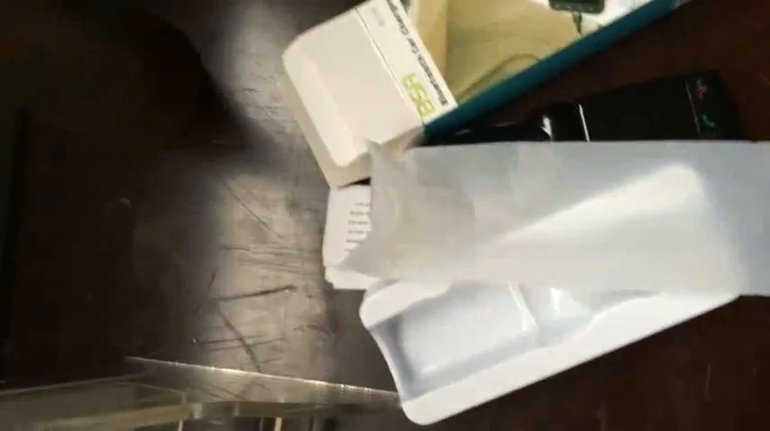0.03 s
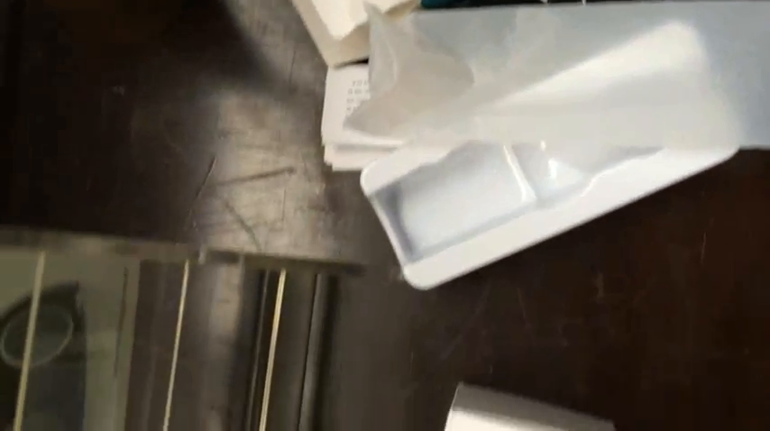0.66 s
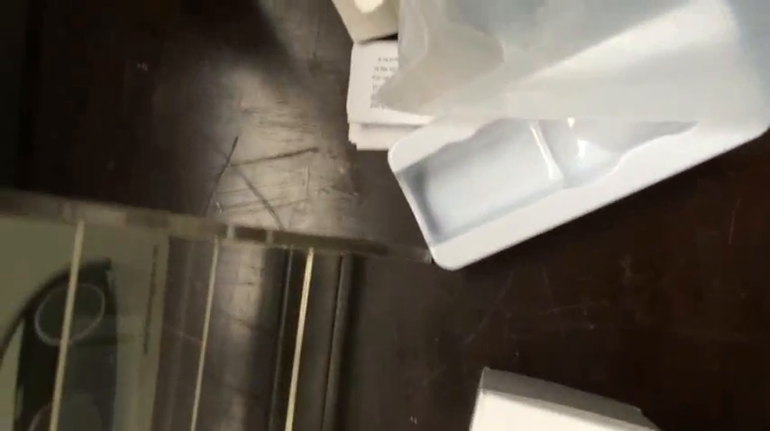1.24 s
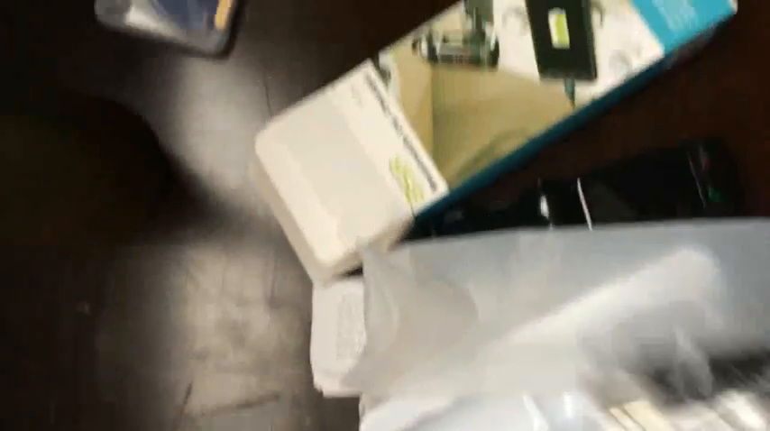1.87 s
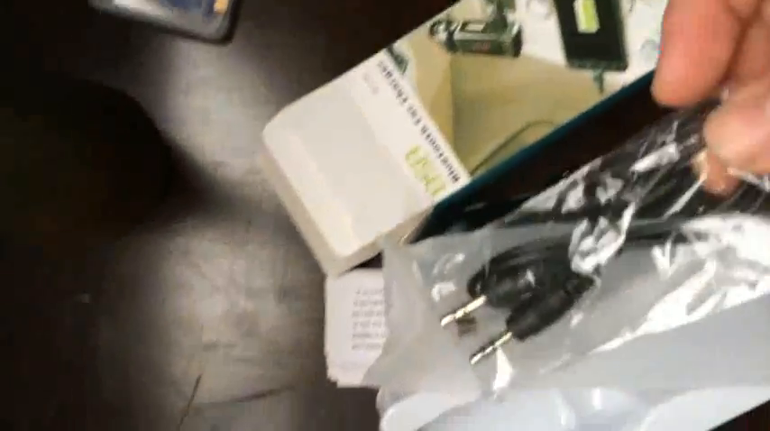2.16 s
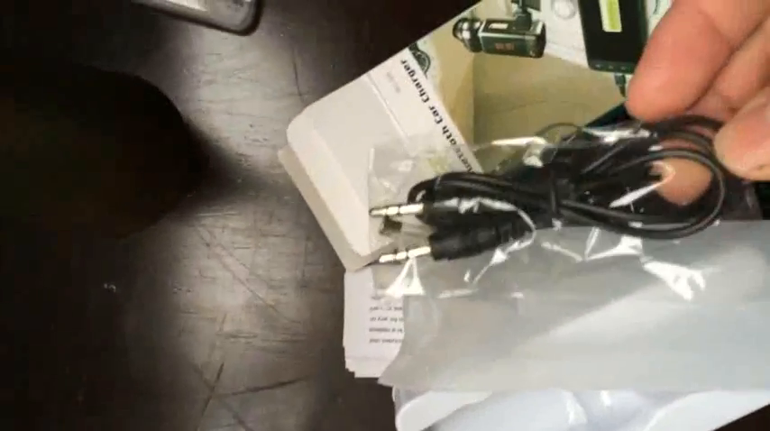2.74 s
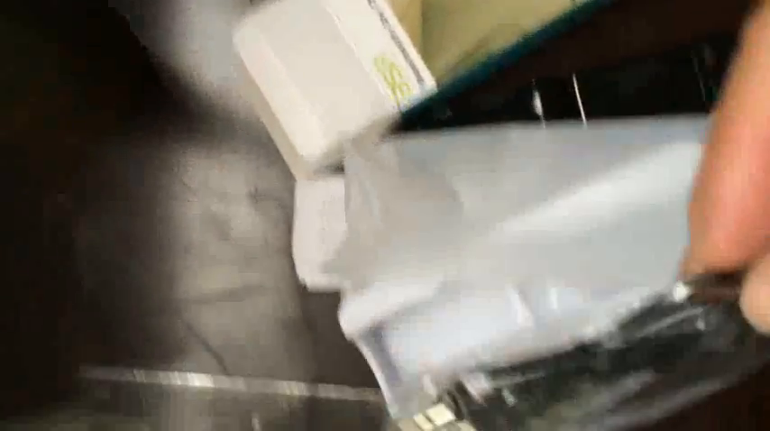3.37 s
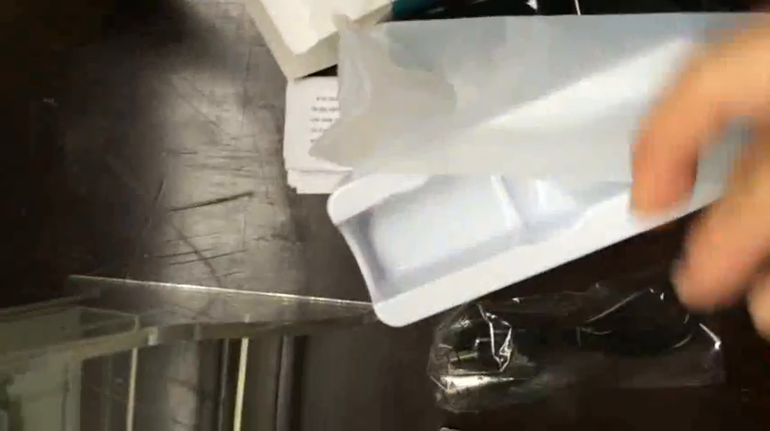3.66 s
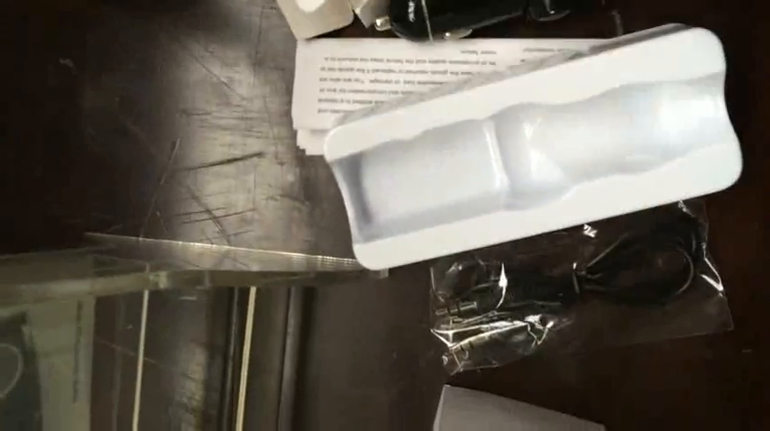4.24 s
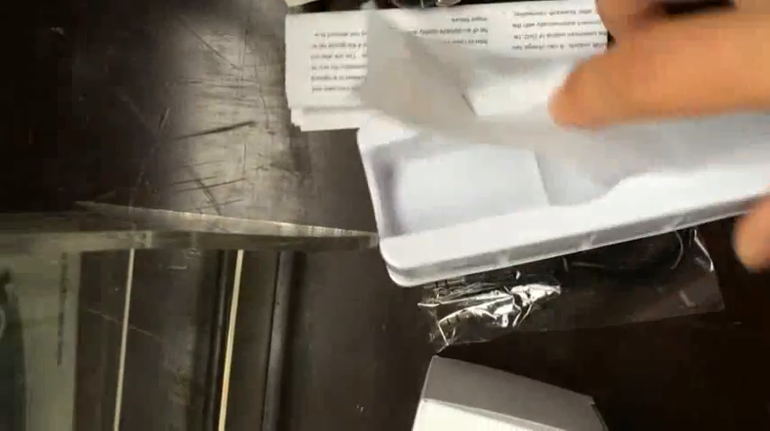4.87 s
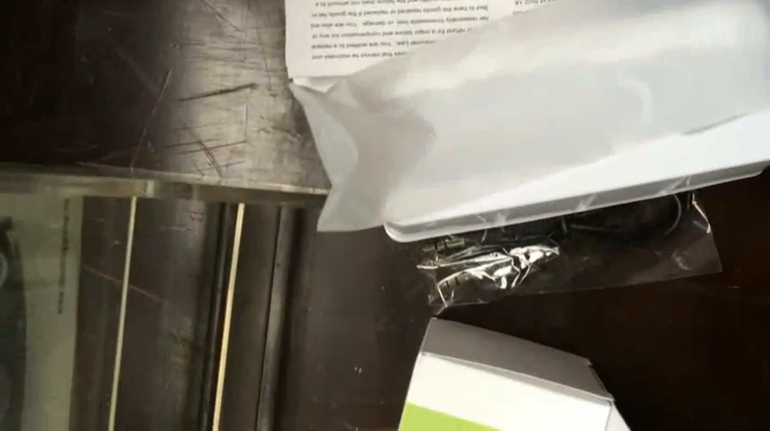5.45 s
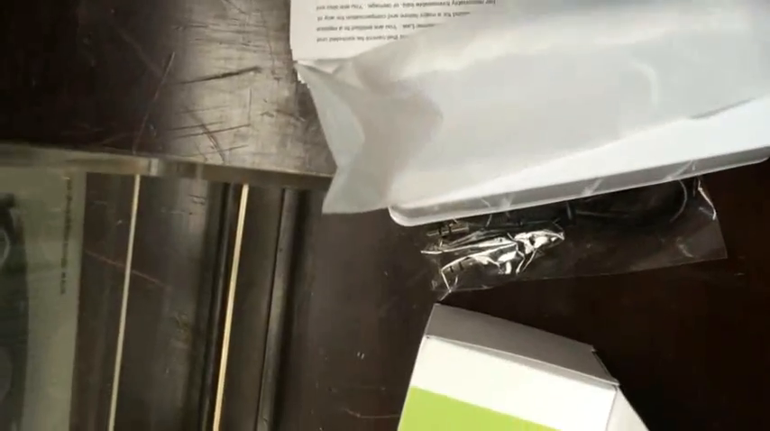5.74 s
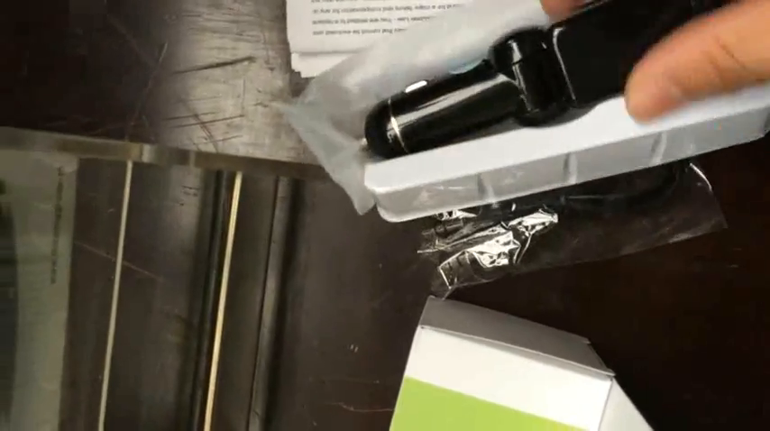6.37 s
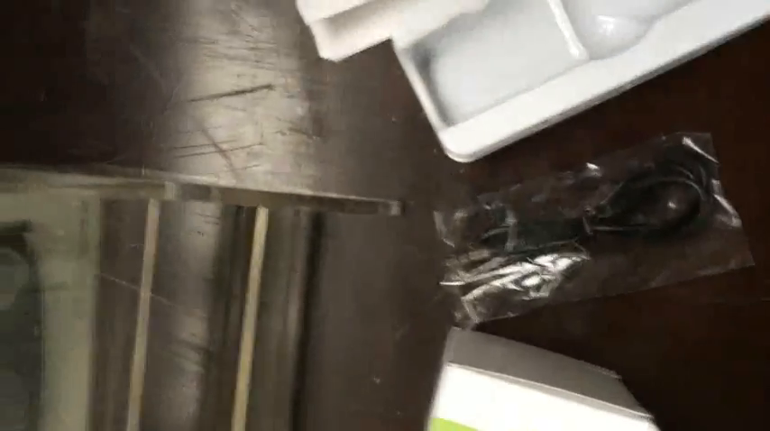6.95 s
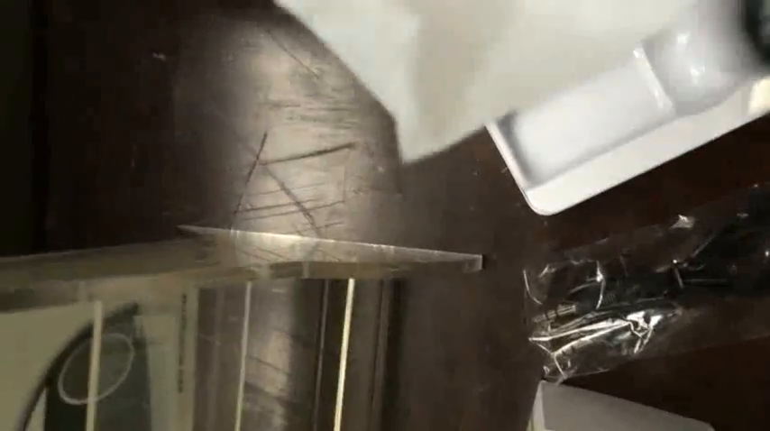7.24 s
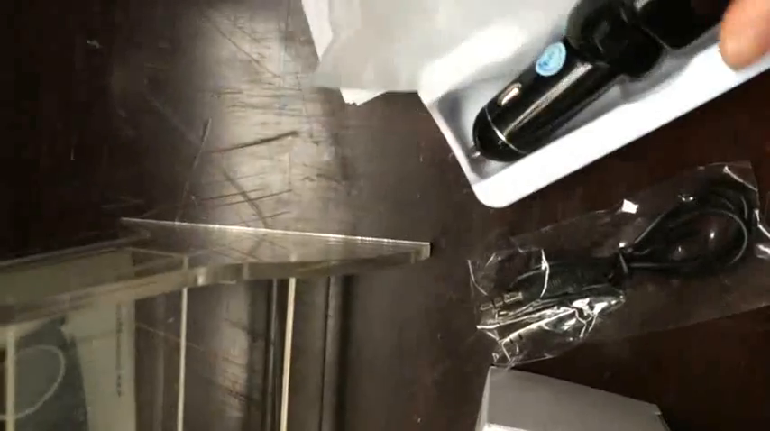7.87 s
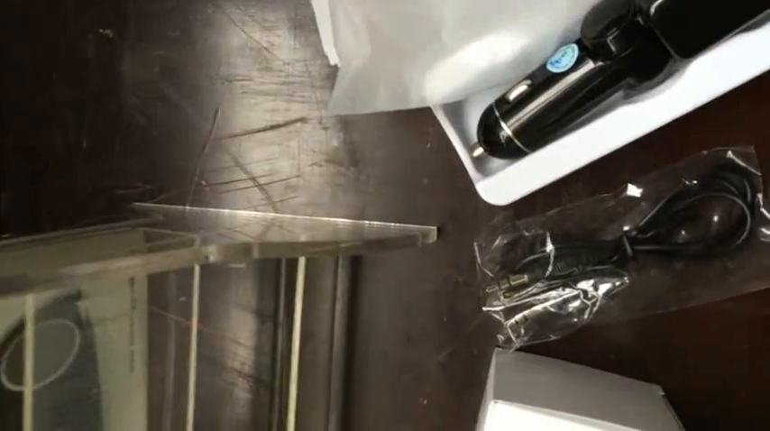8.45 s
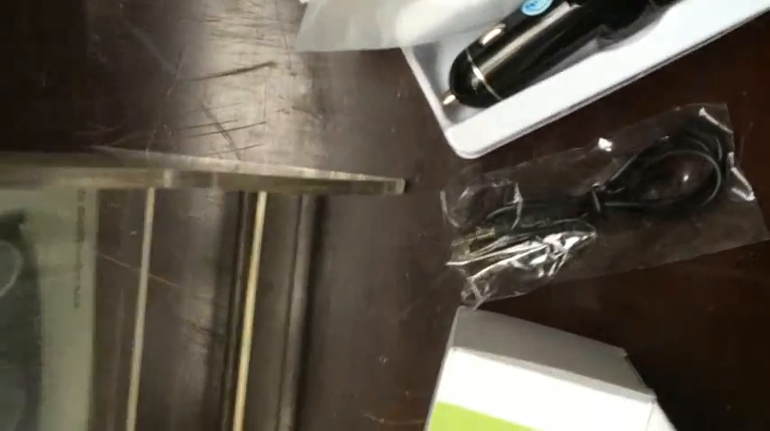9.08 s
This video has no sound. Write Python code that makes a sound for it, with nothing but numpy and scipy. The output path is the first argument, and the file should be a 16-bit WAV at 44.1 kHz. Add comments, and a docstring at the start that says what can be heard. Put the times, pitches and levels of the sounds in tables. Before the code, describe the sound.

A cardboard box scrapes, a plastic bag crinkles, then a thud on wood and a gadget knocking in its plastic tray in a quiet room.

```python
"""A quiet room with a low hum: hands unpack a small gadget on a wooden table, close by.
A cardboard box scrapes and bumps, a thin plastic bag crinkles and is put down, something thuds on the
table, and the hard gadget rubs and clatters in its moulded plastic tray. Blows ring the modes of box,
table and tray; stick-slip friction makes the rubs and squeaks; creases snapping over make the crinkle."""
import sys
import numpy as np
from scipy import signal
from scipy.fft import rfft, irfft
from scipy.io import wavfile
from scipy.ndimage import uniform_filter1d

SR = 44100
rng = np.random.default_rng(int(sys.argv[2]) if len(sys.argv) > 2 else 0)


def generate_wav(sig):
    """Save sig (samples, or channels by samples) to the path in sys.argv[1] as 16-bit PCM at SR."""
    pcm = np.round(np.clip(np.atleast_2d(sig).T, -1, 1) * 32767).astype(np.int16)
    wavfile.write(sys.argv[1], SR, pcm)


N = 406152


def undb(db):
    """Decibels to gain."""
    return 10 ** (np.asarray(db) / 20)


def unit(x):
    """Scale to rms 1."""
    return x / np.sqrt(np.mean(x ** 2) + 1e-20)


def seconds(length_s):
    """Time axis."""
    return np.arange(int(length_s * SR)) / SR


def fade(t, t60_s):
    """Exponential decay, 60 dB in t60_s."""
    return np.exp(-np.log(1000) * t / max(t60_s, 1e-4))


def add(track, start_s, sound):
    """Mix a sound in at start_s."""
    i = max(int(start_s * SR), 0)
    track[i:i + len(sound)] += sound[:max(N - i, 0)]


def through(x, response):
    """Convolve, keeping the input length."""
    return signal.fftconvolve(x, response)[:len(x)]


def spectrum_db(points, size=1024):
    """Interpolate (Hz, dB) points onto FFT bins."""
    hz, db = np.transpose(points)
    return np.interp(np.log(np.fft.rfftfreq(size, 1 / SR) + 1), np.log(hz), db)


def minimum_phase(db):
    """Most compact impulse response with this spectrum."""
    cepstrum = irfft(np.log(undb(db)))
    cepstrum[1:] *= 2
    cepstrum[len(cepstrum) // 2:] = 0
    return irfft(np.exp(rfft(cepstrum)))


def bell(hz, centre_hz, reach_oct):
    """Gain of 1 at the centre, half at reach_oct either side."""
    return 1 / (1 + (np.log2(hz / centre_hz) / reach_oct) ** 2)


def wander(rate_hz):
    """Smooth random drift, rms 1."""
    hold = int(SR / rate_hz)
    steps = np.repeat(rng.standard_normal(N // hold + 1), hold)
    return unit(uniform_filter1d(uniform_filter1d(steps, hold), hold)[:N])


def gesture(strokes, release_t60_s=0.13):
    """Envelope of hand strokes: each speeds up, holds and dies away."""
    out = np.zeros(N)
    for start_s, length_s, attack_s, db in strokes:
        t = seconds(length_s + release_t60_s)
        attack = np.minimum(t / attack_s, 1)
        release = fade(np.maximum(t - length_s, 0), release_t60_s)
        add(out, start_s, undb(db) * attack * release)
    return out


def slips(per_s, jerk_hz, spread_db=3):
    """Stick-slip impulses, mostly weak, coming in uneven jerks."""
    strength = undb(spread_db * np.minimum(rng.exponential(size=N), 5))
    impulses = (rng.random(N) < per_s / SR) * strength * rng.choice([-1, 1], N)
    return impulses * undb(spread_db * wander(jerk_hz))


def ring(modes, centre_hz, reach_oct=0.9):
    """A body's clear modes: contact favours those near centre_hz, each grip shifts them a little."""
    t = seconds(0.3)
    out = np.zeros(len(t))
    for hz, db, t60_s in modes:
        db += 2 * rng.standard_normal()
        hz *= 1 + 0.03 * min(hz / 1500, 1) * rng.standard_normal()
        out += undb(db) * bell(hz, centre_hz, reach_oct) * fade(t, t60_s) * np.sin(2 * np.pi * hz * t)
    return unit(out)


def clack(modes, centre_hz, reach_oct=1.07):
    """Heavily damped modes merge into one broad, dry response."""
    hz = np.fft.rfftfreq(1024, 1 / SR) + 1
    outline = [(SR / 1024, modes[0][1] - 20)] + [row[:2] for row in modes] + [(SR / 2, -32)]
    contact_db = 20 * np.log10(bell(hz, centre_hz, reach_oct))
    return unit(minimum_phase(spectrum_db(sorted(outline)) + contact_db))


def rub(strokes, modes, centre_hz, ringing):
    """Stick-slip drives a body's damped and clear modes."""
    drive = slips(per_s=2000, jerk_hz=55)
    damped = unit(through(drive, clack(modes, centre_hz, reach_oct=2.8)))
    clear = unit(through(drive, ring(modes, centre_hz)))
    return unit(damped + ringing * clear) * gesture(strokes)


# Wooden table top. Each row: mode in Hz, relative level in dB, t60 in seconds.
TABLE_MODES = [(197, -10.5, 0.099), (272.8, -16, 0.63), (324.4, -12, 0.1105), (410, -8, 0.07),
               (550, -12, .06), (646, -0.5, 0.022), (765, -7.5, 0.04), (960, -6.5, 0.025),
               (1120, -10.5, 0.048), (1520, -9, 0.054), (1870, -4.5, 0.0186), (2800, -20, 0.013)]
def blows(events, modes, give_s, rattle, rattle_t60_s, tick_t60_s=0.026, knock_gain=1.0):
    """A blow rings a body and chatters; hard edges tick, weight thumps the table below."""
    out, t = np.zeros(N), seconds(0.3)
    onset = 1 - np.exp(-(t / give_s) ** 2)  # builds while the surface gives
    for start_s, db, centre_hz, tick_db, thump_db in events:
        damped = clack(modes, centre_hz)
        clear = ring(modes, centre_hz) * onset
        chatter = through(rng.standard_normal(len(t)) * fade(t, rattle_t60_s), damped)
        knock = damped * onset[:len(damped)]
        body = clear / np.linalg.norm(clear) + rattle * chatter / np.linalg.norm(chatter)
        add(body, 0, knock_gain * knock / np.linalg.norm(knock))
        body /= np.abs(body).max()
        tick = 0.5 * rng.standard_normal(len(t)) * fade(t, tick_t60_s)
        thump = ring(TABLE_MODES, centre_hz=290, reach_oct=0.29) * fade(t, 0.27) * (1 - fade(t, 0.0346))
        thump *= 0.65 / np.abs(thump).max()
        add(out, start_s, undb(db) * (body + undb(tick_db) * tick + undb(thump_db) * thump))
    return out


# Room noise. Each row: frequency in Hz, relative density in dB.
AIR_SPECTRUM = [(12, -58), (20, -32.5), (42, -7.5), (64, -9), (153, -11.5), (225, -18.5), (298, -24.5),
                (324, -26.5), (393, -25), (788, -34), (1130, -33), (1340, -37), (1670, -38.5), (2400, -42),
                (15500, -60)]
# Hum. Each row: mean frequency in Hz, nominal rms in dB.
HUM_TONES = [(50, -55.5), (66.3, -48.5), (113, -57.5)]
def room_tone(air_db=-42.5, waver_db=3.5, waver_hz=1.2):
    """Soft rumble and hiss under a low, wavering hum."""
    white = rfft(rng.standard_normal(N))
    out = undb(air_db) * unit(irfft(white * undb(spectrum_db(AIR_SPECTRUM, N)), N))
    for hz, db in HUM_TONES:
        amplitude = np.sqrt(2) * undb(db + waver_db * wander(8.3))
        phase = 2 * np.pi * np.cumsum(hz + waver_hz * wander(5.1)) / SR
        out += amplitude * np.sin(phase)
    return out


# Cardboard box. Each row: mode in Hz, relative level in dB, t60 in seconds.
BOX_MODES = [(195, -0.5, 0.042), (290, -13.5, 0.019), (417, -10, 0.007), (776, -4, 0.034), (842, -4, 0.012),
             (856, -10, 0.0062), (1304, -8.5, 0.012), (1526, -7, 0.035), (1828, -12.5, 0.056),
             (2510, -13, 0.045)]
# Pushes. Each row: start, length and attack in seconds, level in dB.
BOX_STROKES = [(0, .3, 0.016, -40), (.3, 0.13, 0.0073, -35.5), (.83, 0.61, 0.047, -45),
               (1.38, 0.29, 0.018, -37)]
def box_slide():
    """Cardboard sticks and slips as the box is pushed along."""
    return rub(BOX_STROKES, BOX_MODES, centre_hz=1320, ringing=0.76)


# Sliding film. Each row: frequency in Hz, relative density in dB.
RUSTLE_SPECTRUM = [(880, -47), (1500, 0.5), (2670, 1.5), (3480, -0.5), (8540, 1.5), (11400, 0),
                   (14600, -1.5), (15500, -9.5)]
# Hands on the film. Each row: start, length and attack in seconds, rustle and crinkle gains in dB.
FILM_HANDLING = [(0, 0.22, 0.0047, -59, -42), (0.186, 0.246, 0.11, -39, -39), (0.823, 0.61, 0.27, -32, -30),
                 (1.454, .44, 0.022, -52, -38.5), (1.953, 0.45, 0.061, -51, -36.5),
                 (2.487, 0.29, 0.014, -71, -43.5), (3.115, 0.059, 0.012, -67, -31),
                 (3.3, 0.0896, .015, -69.5, -44.5), (3.51, 0.09, 0.0092, -59, -32),
                 (3.62, 0.17, 0.063, -35.5, -27.5), (4.009, 0.18, 0.02, -53, -46.5),
                 (4.541, 0.33, 0.023, -56.5, -50), (4.92, 0.15, .04, -47, -34.5),
                 (5.31, 0.034, 0.011, -56.5, -49), (5.516, 0.083, 0.018, -44.5, -51),
                 (6.051, 0.18, 0.027, -55, -37), (6.4, .39, 0.37, -44, -34), (7.839, 0.24, 0.045, -55, -47),
                 (8.423, 0.052, 0.023, -47, -43)]
def film_rustle():
    """Countless small creases creep while the plastic film slides."""
    grains = slips(per_s=4000, jerk_hz=110, spread_db=3.5)
    rustle = unit(through(grains, minimum_phase(spectrum_db(RUSTLE_SPECTRUM))))
    return rustle * gesture([row[:4] for row in FILM_HANDLING])


def film_crinkle(per_s=48, centre_hz=6400, spread_oct=0.58, spread_db=3):
    """Lesser creases snap at random while a hand works the film."""
    lateness, strength, brightness = rng.standard_normal((int(per_s * N / SR), 3)).T
    starts_s = np.abs(np.arange(len(lateness)) + 0.5 * lateness) / per_s
    creases = zip(starts_s, spread_db * strength, centre_hz * 2 ** (spread_oct * brightness))
    return film_snaps(creases) * gesture([(*timing, db) for *timing, _, db in FILM_HANDLING])


# Bumps. Each row: start in seconds, level in dB, ring centre in Hz, relative tick and thump in dB.
BOX_HITS = [(0.0368, -22, 804, -26, -17), (0.1072, -10.5, 780, -8, -37), (1.0966, -24, 814, 9, -25),
            (1.2342, -30, 820, 0, -22), (1.3904, -23, 1470, 9.5, -12), (1.4133, -21.5, 334, 9.5, -28),
            (1.4654, -19.5, 776, 4.5, -7), (1.4852, -4.5, 850, -17, -27.5)]
def box_bumps():
    """Soft cardboard gives slowly, then rings and rattles."""
    return undb(3) * blows(BOX_HITS, BOX_MODES, give_s=0.0038, rattle=0.72, rattle_t60_s=0.044)


# Scrapes. Each row: midpoint in seconds, rms at the crest in dB, centre in Hz, length in seconds.
EDGE_SCRAPES = [(.092, -26.5, 1580, 0.02), (0.257, -33, 1710, 0.031), (1.396, -27.5, 1960, 0.023),
                (1.422, -35, 875, 0.073), (1.481, -26.5, 1030, 0.025), (4.054, -37, 1580, 0.022),
                (4.17, -36.5, 1560, 0.017), (4.628, -40.5, 1530, .06), (4.769, -36, 1430, 0.027),
                (4.813, -28, 1880, 0.041), (5.01, -32, 1970, 0.02), (5.351, -45.5, 1000, 0.028),
                (5.533, -29, 1460, 0.014), (7.93, -40, 1300, .022), (8.447, -47.5, 1470, .058)]
def edge_scrapes(grit_db=-19):
    """An edge catches on plastic or card: a swell of slips through one broad resonance."""
    out, t = np.zeros(N), seconds(0.2)
    hz = np.fft.rfftfreq(1024, 1 / SR) + 1
    drive = slips(per_s=1400, jerk_hz=250)
    for middle_s, db, centre_hz, length_s in EDGE_SCRAPES:
        run = drive[rng.integers(N - len(t)):][:len(t)]
        resonance = minimum_phase(40 * np.log10(bell(hz, centre_hz, reach_oct=1.24)))
        scrape = unit(through(run, resonance)) + undb(grit_db) * unit(run)
        swell = np.exp(-0.5 * ((t - t.mean()) / (0.34 * length_s)) ** 2)
        add(out, middle_s - t.mean(), undb(db) * scrape * swell)
    return out


# Snapping film. Each row: frequency in Hz, relative density in dB.
SNAP_SPECTRUM = [(150, -15), (500, -5), (1200, -0.5), (2300, -2), (2900, -1.5), (3800, -1.5), (5000, -1),
                 (8000, -1), (12000, 0), (15500, -4)]
# Creases of bag and sleeve. Each row: start in seconds, rms of the first 5 ms in dB, brightness in Hz.
LOUD_CREASES = [(.0945, -27.5, 7700), (.2063, -30.5, 4200), (.2592, -25.5, 7500), (.3325, -20, 6270),
                (.4102, -26.5, 6800), (.833, -31.5, 3200), (.849, -24.5, 8600), (.9405, -21.5, 7350),
                (.9777, -23, 7350), (1.0374, -23, 10100), (1.0769, -23.5, 4940), (1.1242, -21.5, 8000),
                (1.2046, -21, 6140), (1.2214, -19.5, 4000), (1.254, -31, 4150), (1.3066, -27, 7350),
                (1.3958, -20, 5400), (1.4105, -31, 4100), (1.621, -25, 9500), (1.6731, -29, 6060),
                (1.7095, -25.5, 7800), (1.7254, -24.5, 5970), (1.7563, -24.5, 7040), (1.8535, -29, 8450),
                (1.9795, -23.5, 5740), (1.9977, -26, 7800), (2.01, -19, 9100), (2.0808, -25, 7500),
                (2.0925, -21, 6070), (2.0993, -21.5, 5050), (2.1551, -19.5, 5260), (2.188, -21.5, 5900),
                (2.2108, -20, 8000), (2.2731, -21, 7500), (2.289, -23, 6300), (2.3202, -22.5, 5630),
                (2.3622, -26.5, 4170), (2.3822, -16, 9150), (2.415, -23.5, 7000), (2.5034, -28.5, 2270),
                (2.5153, -28.5, 7400), (2.5376, -21, 7540), (2.5493, -24, 7040), (2.5652, -24, 7700),
                (2.6286, -28, 5750), (2.6609, -19.5, 7300), (2.7043, -24, 6500), (2.74, -27.5, 6000),
                (2.786, -29, 9000), (2.9377, -25, 9300), (3.0331, -34, 2890), (3.0757, -27.5, 4980),
                (3.142, -21, 8600), (3.3374, -33, 10400), (3.4018, -27, 5400), (3.4978, -22, 7480),
                (3.5054, -22, 3980), (3.5236, -25.5, 9720), (3.5523, -26.5, 4545), (3.655, -25.5, 8900),
                (3.6972, -17, 5970), (3.7211, -13, 8240), (3.7448, -8.5, 8160), (3.755, -13.5, 8110),
                (3.7595, -12, 7460), (3.7883, -19, 7840), (4.1234, -32, 8100), (4.2788, -46.5, 5810),
                (4.6, -35.5, 7600), (4.9116, -32, 4560), (4.979, -27, 5940), (5.0365, -28, 8600),
                (5.3955, -34.5, 5200), (6.1424, -29.5, 3840), (6.2752, -23, 5650), (6.3904, -25, 4600),
                (6.3964, -27, 4700), (6.4283, -29.5, 6550), (6.5604, -29.5, 9200), (7.057, -46, 7260),
                (7.5436, -28.5, 7460), (7.9502, -29.5, 9000), (8.6531, -26, 7100)]
def film_snaps(creases, neutral_hz=6500, crack_t60_s=0.015, spike=3.8):
    """A crease flips with a spike and a short crack; its neighbours tick right after."""
    out, t = np.zeros(N), seconds(0.04)
    head = int(0.005 * SR)
    film_db = spectrum_db(SNAP_SPECTRUM)
    hz = np.fft.rfftfreq(1024, 1 / SR) + 4.5
    octaves = np.log2(np.maximum(hz, 1800) / neutral_hz)
    flutter = 0.04 * fade(t, 0.024)
    for start_s, db, centre_hz in creases:
        # Small facets die sooner and resonate higher; each radiates little below its resonance.
        t60_s = crack_t60_s * np.sqrt(neutral_hz / centre_hz) * 2 ** rng.uniform(-0.45, 0.5)
        facet_hz = centre_hz * rng.uniform(0.25, 0.8)
        resonance_db = 6 * bell(hz, facet_hz, reach_oct=0.25)
        low_cut_db = 10 * np.log10(1 + (0.5 * facet_hz / (hz + 300)) ** 2)
        tilt_db = 4.5 * np.log2(centre_hz / neutral_hz) * octaves
        force = rng.standard_normal(len(t)) * (fade(t, t60_s) + flutter)
        force[int(0.0003 * SR)] += spike * rng.choice([-1, 1])
        force[rng.integers(2 * head, size=4)] += 0.26 * spike * rng.standard_normal(4)  # neighbours
        snap = through(force, minimum_phase(film_db + resonance_db - low_cut_db + tilt_db))
        add(out, start_s, undb(db) * snap / np.std(snap[:head]))
    return out


# Squeaks. Each row: start and length in seconds, first and last pitch in Hz, rms in dB.
SQUEAK_GLIDES = [(0.249, 0.0192, 1940, 1710, -24.5), (0.339, 0.032, 806, 767, -29.5),
                 (.368, 0.039, 858, 926, -28), (4.047, 0.012, 1820, 1790, -36.5)]
def squeaks(jitter=0.018, overtone_db_per_oct=-11):
    """Stick-slip of card or plastic locks briefly into a rough, gliding tone."""
    out, waver = np.zeros(N), wander(400)
    for start_s, length_s, first_hz, last_hz, db in SQUEAK_GLIDES:
        size = int(length_s * SR)
        hz = np.linspace(first_hz, last_hz, size) * (1 + jitter * waver[int(start_s * SR):][:size])
        phase = 2 * np.pi * np.cumsum(hz) / SR
        tone = sum(undb(overtone_db_per_oct * np.log2(k)) * np.sin(k * phase) for k in range(1, 5))
        add(out, start_s, undb(db) * unit(tone) * signal.windows.tukey(size, 0.5))
    return out


# Landings. Each row: start in seconds, level in dB, ring centre in Hz, relative tick and thump in dB.
TABLE_HITS = [(3.7241, -22, 3450, -12, -41), (3.7554, -16.5, 3140, -21, -28),
              (4.0846, -16.5, 790, -23, -26), (5.4044, -19.5, 276, -22, -5), (5.4586, -29, 220, -20, -16),
              (5.4886, -33.5, 278, -16, -3), (5.5479, -1.5, 746, -24.5, -16)]
def table_thuds():
    """Things land on the hard table top and chatter."""
    thuds = blows(TABLE_HITS, TABLE_MODES, give_s=0.00015, rattle=0.6, rattle_t60_s=0.14, tick_t60_s=0.077)
    return undb(4) * thuds


# Plastic tray. Each row: mode in Hz, relative level in dB, t60 in seconds.
TRAY_MODES = [(306, -15.5, 0.025), (510, -16, 0.034), (748, -17, 0.034), (953, -3.5, 0.021),
              (1086, -9, 0.038), (1335, -10, 0.014), (1670, -4, 0.023), (1876, -3, 0.022),
              (2118, -3, 0.015), (2320, -6, 0.014), (2798, -9.5, 0.018), (3110, -11.5, 0.027),
              (4450, -18, 0.017)]
# Drags. Each row: start, length and attack in seconds, level in dB.
TRAY_STROKES = [(4.03, 0.19, .04, -47), (4.57, 0.5, 0.049, -48.5), (4.92, 0.086, 0.044, -39),
                (6.07, .07, .02, -46), (6.42, 0.44, 0.38, -38.5), (7.85, 0.22, 0.053, -41.5)]
def tray_drags():
    """Sleeve and gadget stick and slip over the tray."""
    return rub(TRAY_STROKES, TRAY_MODES, centre_hz=1530, ringing=0.35)


# Knocks. Each row: start in seconds, level in dB, ring centre in Hz, relative tick in dB.
TRAY_HITS = [(4.0853, -12.5, 1040, -12), (4.6275, -21, 1500, -20), (6.1024, -14.5, 1070, -15),
             (6.1291, -4.5, 1750, -11.5), (6.2245, -4, 1990, -21), (6.5356, -16, 2230, -31.5),
             (6.587, -12.5, 960, -7.5), (6.7711, -4.5, 1040, -23.5), (6.7969, 0.5, 1620, -31),
             (6.818, -6.5, 1610, -36.5), (7.6506, -4, 1680, -18), (7.6797, -7.5, 1700, -35),
             (7.8451, -23, 1660, -26), (7.8534, -17, 1710, -40.5), (7.8977, -16, 1090, -0.5),
             (7.9074, -18, 1115, -25), (7.9783, 0, 1880, -24), (8.041, -3, 1873, -18),
             (8.0509, -3.5, 1940, -34), (8.0591, -7, 2290, -26)]
def tray_knocks(thump_db=-26.5, thump_db_per_oct=-16.5):
    """The gadget rings the tray; the duller the knock, the more reaches the table."""
    events = [(start_s, db, hz, tick_db, thump_db + thump_db_per_oct * np.log2(hz / 1030))
              for start_s, db, hz, tick_db in TRAY_HITS]
    return blows(events, TRAY_MODES, give_s=0.00089, rattle=1.0, rattle_t60_s=0.02, knock_gain=0.63)


# Reverberation. Each row: band centre in Hz, gain in dB, t60 in seconds.
ECHO_BANDS = [(151.1, -4.5, .5), (400, -8, 0.22), (896, -15.5, 1), (2220, -18, 1), (4000, -15, 0.45),
              (8000, -20, 0.58), (15000, -26, .38)]
def room_echo(x, build_s=0.0085, near_db=-16):
    """Quick reflections off things on the table, then the diffuse tail of the walls."""
    t = seconds(0.79)
    log_centres = np.log([row[0] for row in ECHO_BANDS])
    log_bins = np.log(np.fft.rfftfreq(len(t), 1 / SR) + 1)
    noise, tail = rfft(rng.standard_normal(len(t))), np.zeros(len(t))
    for (_, db, t60_s), share in zip(ECHO_BANDS, np.eye(len(ECHO_BANDS))):
        band = irfft(noise * np.interp(log_bins, log_centres, share), len(t))
        envelope = fade(t, t60_s) * (1 - np.exp(-(t / build_s) ** 2))
        tail += undb(db) * band * envelope / np.linalg.norm(envelope)
    near = rng.standard_normal(len(t)) * fade(t, 0.06) * (t > 0.002)
    return through(x, tail + undb(near_db) * near / np.linalg.norm(near))


def scene():
    """All the handling, direct and reflected, over the room tone; mono."""
    hands = box_bumps() + table_thuds() + box_slide() + tray_drags() + tray_knocks()
    hands += edge_scrapes() + squeaks()
    hands += film_snaps(LOUD_CREASES) + film_crinkle() + film_rustle()
    return (hands + room_echo(hands) + room_tone())[None]


def record(dry, cutoff_hz=15500):
    """Clip at full scale, then low-pass."""
    low_pass = signal.ellip(8, 0.2, 70, cutoff_hz, fs=SR, output="sos")
    return signal.sosfilt(low_pass, np.clip(dry, -1, 1))


dry = scene()
out = record(dry)
generate_wav(out)
```